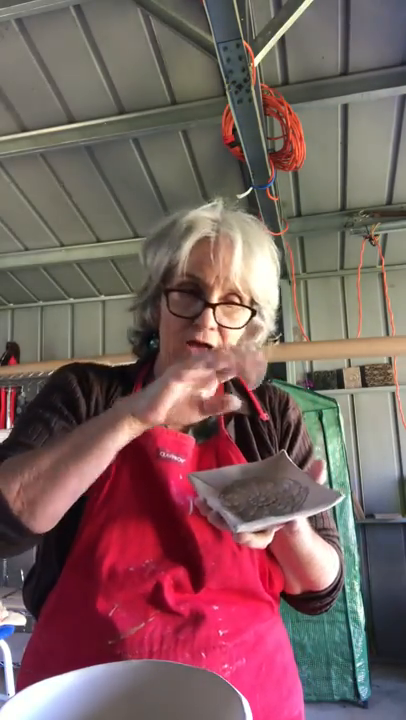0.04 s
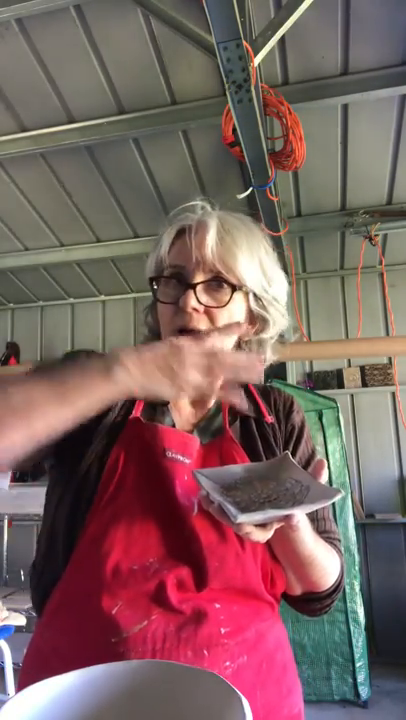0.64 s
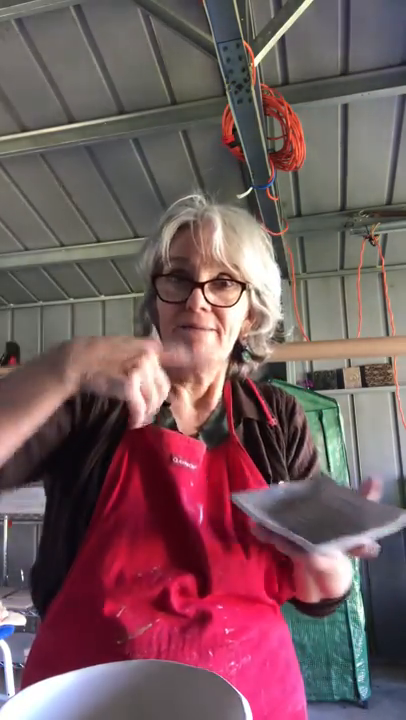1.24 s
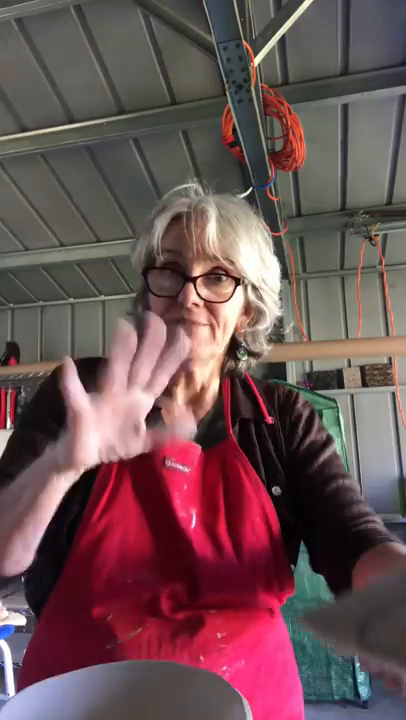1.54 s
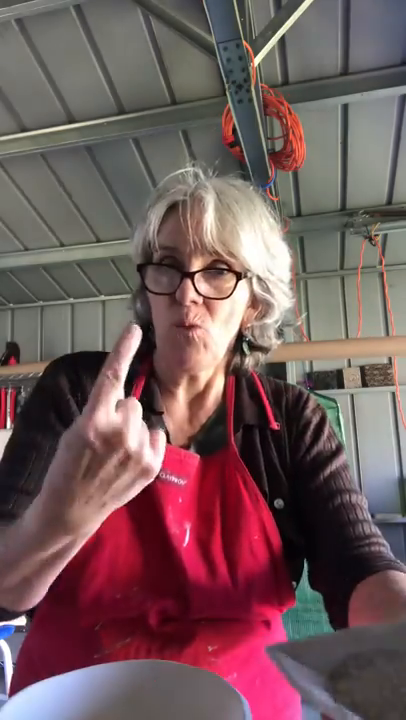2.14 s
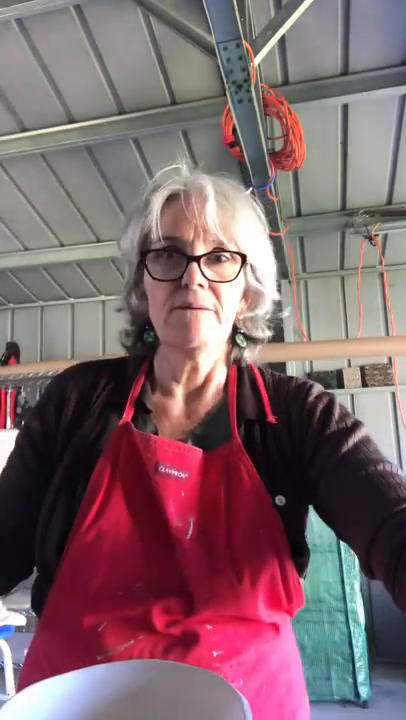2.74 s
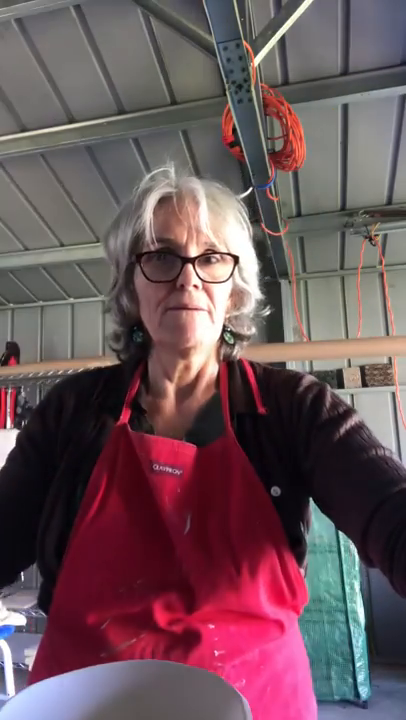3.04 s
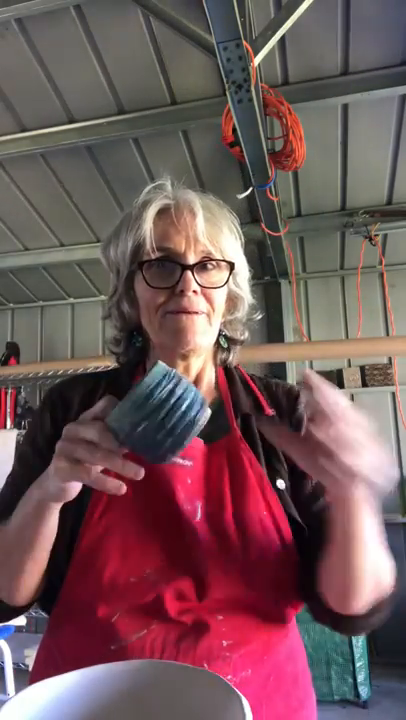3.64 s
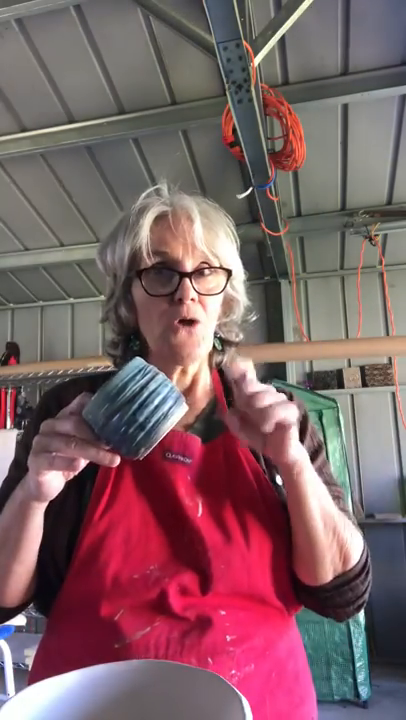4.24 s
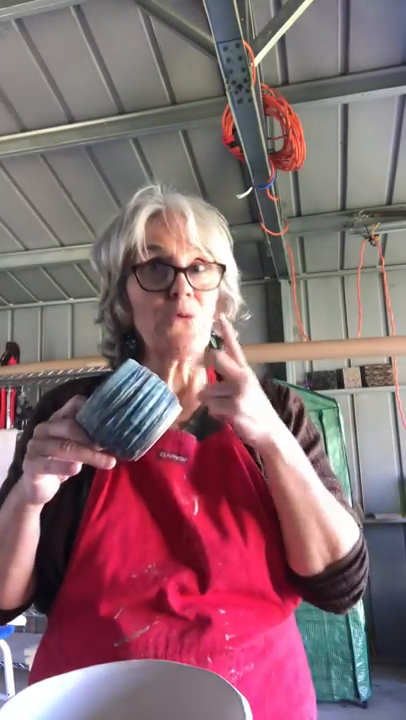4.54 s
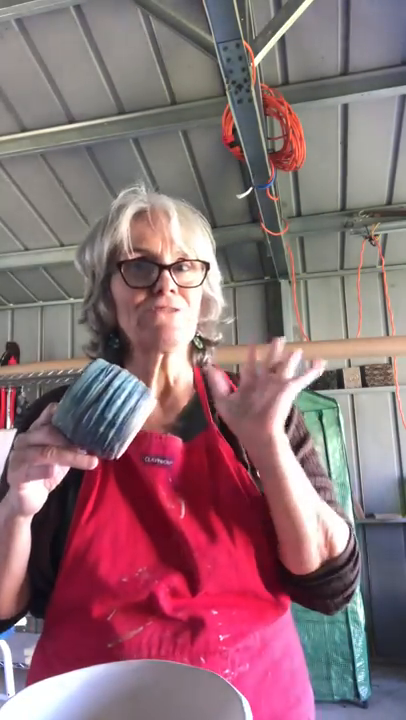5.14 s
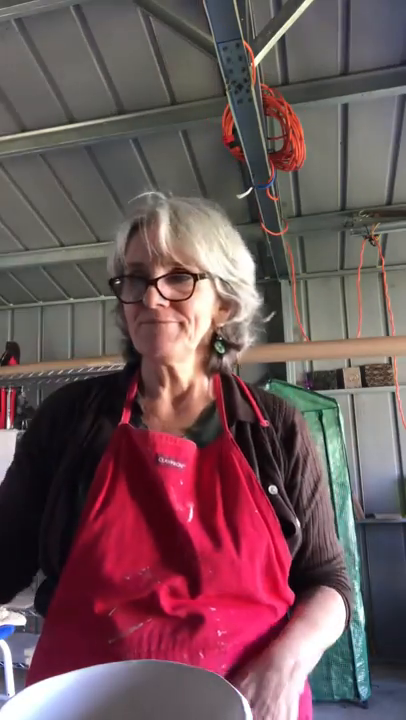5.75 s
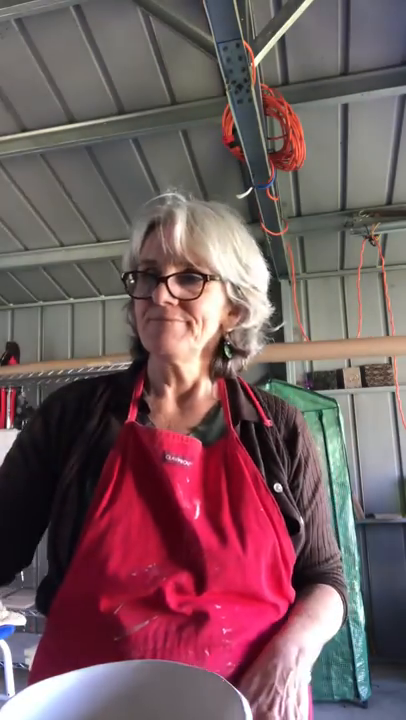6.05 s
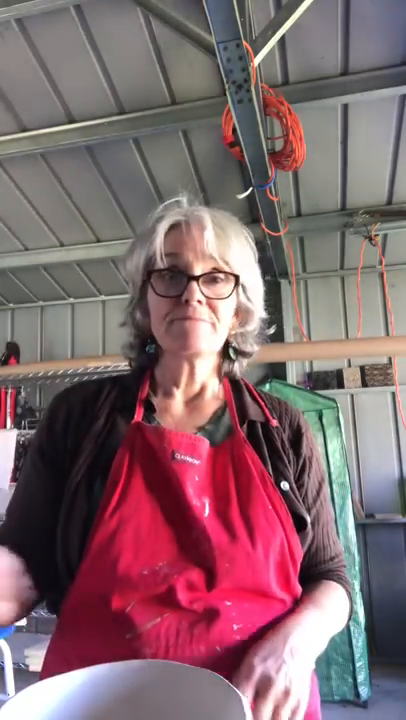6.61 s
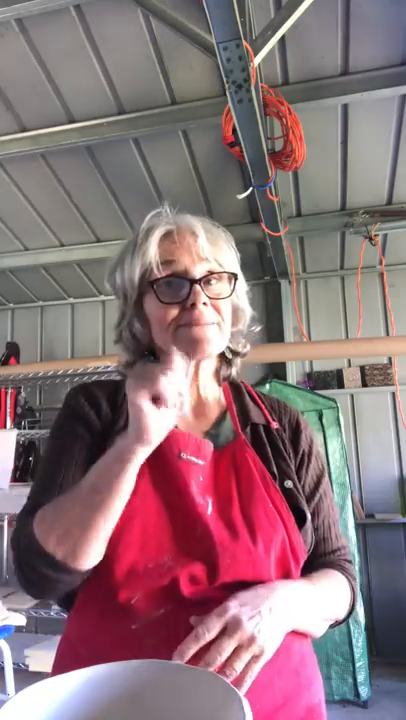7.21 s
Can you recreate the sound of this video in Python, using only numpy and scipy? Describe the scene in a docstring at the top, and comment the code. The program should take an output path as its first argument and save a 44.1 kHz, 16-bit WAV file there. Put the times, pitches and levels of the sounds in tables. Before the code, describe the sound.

In a quiet workshop, a dish knocks down on wood, sleeves rustle softly, and a cup is picked up and later clatters back.

```python
"""A glazed dish is set down on a wooden bench close by, ringing the boards, in a metal-roofed workshop.
Further off a stoneware cup is dragged off a shelf and later put back, its foot chattering to rest.
Sleeves rustle and fingers tap and slide in between; a bird calls faintly over the hush of outdoor air.
The shed adds short diffuse echoes."""
import sys
import numpy as np
from scipy import signal
from scipy.fft import rfft, irfft
from scipy.io import wavfile
from scipy.ndimage import uniform_filter1d

SR = 44100
rng = np.random.default_rng(int(sys.argv[2]) if len(sys.argv) > 2 else 0)


def persist_wave(psi):
    """Save psi, clipped to +-1, as 16-bit WAV."""
    counts = np.round(np.clip(psi, -1, 1) * 32767).astype(np.int16)
    wavfile.write(sys.argv[1], SR, np.atleast_2d(counts).T)


N = 329634
TIME_S = np.arange(N) / SR
RING_S = TIME_S[:SR // 2]

# cup foot touching the shelf: start_s, level_db, looseness (of the grip, 0-1)
FOOT_CONTACTS = [(2.9913, -46.5, 0.2), (3.1017, -53, 0.1), (3.175, -49, .02), (6.2123, -49, .05),
                 (6.41, -55, 0.5), (6.4134, -45, .55), (6.4244, -38.5, 0.75), (6.432, -51, 0.6),
                 (6.437, -39, 0.83), (6.4405, -49, .2)]
# hand-damped stoneware: mode_hz, level_db, t60_s
CUP_MODES = [(1754, -12, .22), (2325, -16, .14), (2401, -8, .07), (3280, -19, .03), (3402, -17, .05),
             (3890, -13, .05), (4310, -11, .018), (4736, -10, .03), (4808, -15, .04), (5450, -2, .016),
             (5780, -4, .013), (6270, -13, .05), (7380, -15, .025), (7880, -20, .02), (9600, -22, .02),
             (12810, -18, .022)]


def undb(db):
    """Decibels to gain."""
    return 10 ** (np.asarray(db) / 20)


def unit(x):
    """Scale to rms 1."""
    return x / np.sqrt(np.mean(x ** 2))


def colour(x, spectrum):
    """Filter by (freq_hz, gain_db) points."""
    hz, db = np.transpose(spectrum)
    bins_hz = np.fft.rfftfreq(len(x), 1 / SR) + 1
    return irfft(rfft(x) * undb(np.interp(np.log(bins_hz), np.log(hz), db)), len(x))


def band(x, lo_hz, hi_hz):
    """Band-pass."""
    return signal.sosfilt(signal.butter(2, [lo_hz, hi_hz], "band", fs=SR, output="sos"), x)


def highpass(x, cut_hz):
    """Thin the bass."""
    return signal.sosfilt(signal.butter(2, cut_hz, "high", fs=SR, output="sos"), x)


def wander(rate_hz):
    """Smooth random drift, rms 1."""
    size = int(SR / rate_hz)
    steps = np.repeat(rng.standard_normal(N // size + 1), size)
    return unit(uniform_filter1d(steps, size)[:N])


def add(track, start_s, sound):
    """Mix a sound into the track."""
    i = int(start_s * SR)
    track[i:i + len(sound)] += sound[:N - i]


def fade(t60_s):
    """Exponential decay."""
    return np.exp(-np.log(1000) * RING_S / t60_s)


def ring(modes):
    """Impulse response of a body; its modes push the air with differing signs."""
    signs = np.resize([1, -1, -1, 1, -1], len(modes))
    return sum(sign * undb(db) * fade(t60_s) * np.sin(2 * np.pi * hz * RING_S)
               for sign, (hz, db, t60_s) in zip(signs, modes))


def burst(spectrum, t60_s):
    """Crowded, fast-dying modes as coloured noise."""
    return unit(colour(rng.standard_normal(len(RING_S)), spectrum)) * fade(t60_s)


def strike(blows, body):
    """Each blow rings the body; a softer contact lasts longer and loses the highs."""
    out = np.zeros(N)
    for start_s, level_db, cut_hz, *body_args in blows:
        contact = signal.butter(3, min(cut_hz, SR / 2 - 1), fs=SR, output="sos")
        hit = signal.sosfilt(contact, body(*body_args))
        add(out, start_s, hit * undb(level_db) / np.std(hit[:SR // 100]))  # level over the first 10 ms
    return highpass(out, cut_hz=45)  # every blow is thinned below 45 Hz


def hush(level_db=-54.5, waver_db=1.9):
    """Steady outdoor air through the walls; the rumble wavers a little."""
    # air spectrum: freq_hz, density_db
    spectrum = [(15, -59), (25, -26), (41, -6), (69, 1.5), (110, -7.5), (148, -8.5), (305, -12.5),
                (495, -20), (1110, -22.5), (2360, -30.5), (3170, -34), (4870, -39), (6730, -39.5),
                (10400, -47), (15500, -47)]
    air = unit(colour(rng.standard_normal(N), spectrum))
    rumble = band(air, lo_hz=38.7, hi_hz=310)
    return undb(level_db) * (air + rumble * (undb(waver_db * wander(rate_hz=5)) - 1))


def shed(x, first_s=0.0077, roof_s=0.054, roof_width_s=0.0066, roof_db=3):
    """Diffuse echoes, duller as they fade, with a swell when the roof answers."""
    # reverberation bands: centre_hz, t60_s, level_db
    bands = [(100, 0.97, 0.5), (300, 0.43, 5.5), (890, .5, 3.5), (2120, 0.4, -0.5), (3840, 0.44, -2.5),
             (6860, 0.19, -7), (12000, 0.29, 0)]
    log_centres = np.log([hz for hz, _, _ in bands])
    log_bins = np.log(np.fft.rfftfreq(len(RING_S), 1 / SR) + 1)
    noise_spectrum = rfft(rng.standard_normal(len(RING_S)))
    response = np.zeros(len(RING_S))
    for share, (_, t60_s, level_db) in zip(np.eye(len(bands)), bands):
        band_noise = irfft(noise_spectrum * np.interp(log_bins, log_centres, share), len(RING_S))
        response += undb(level_db) * band_noise * fade(t60_s)
    swell = undb(roof_db * np.exp(-((RING_S - roof_s) / roof_width_s) ** 2))
    return signal.fftconvolve(x, response * swell * (RING_S > first_s))[:N] / np.sqrt(SR / 20)


def bird(level_db=-70, waver=0.0395):
    """Thin, wavering whistles."""
    # calls: start_s, length_s, pitch_hz
    calls = [(4.968, 0.097, 3150), (5.08, .06, 3315), (5.14, 0.06, 3340), (6.569, 0.11, 3100)]
    out = np.zeros(N)
    for start_s, length_s, pitch_hz in calls:
        size = int(length_s * SR)
        hz = pitch_hz * (1 + waver * wander(rate_hz=200)[:size])
        whistle = np.sin(2 * np.pi * np.cumsum(hz) / SR)
        add(out, start_s, undb(level_db) * unit(whistle * np.hanning(size)))
    return out


def finger_slides(level_db=-80):
    """Dry skin on skin: brief, very high swishes."""
    # slides: start_s, length_s
    slides = [(2.0, 0.073), (3.88, 0.12), (4.134, .14)]
    out = np.zeros(N)
    for start_s, length_s in slides:
        size = int(length_s * SR)
        swish = band(rng.standard_normal(len(RING_S)), lo_hz=10500, hi_hz=16000)[:size]
        add(out, start_s, undb(level_db) * unit(swish * np.hanning(size)))
    return out


def stroke(peak_s, rise_s, fall_s, level_db):
    """Gain of a rub that speeds up until peak_s, then slows."""
    away = np.abs(TIME_S - peak_s) / np.where(TIME_S < peak_s, rise_s, fall_s)
    return undb(level_db) * np.exp(-away ** 1.6)  # exponent: 1 pointed, 2 rounded


def clothes(flutter_db=1.9, bright_gain=1.3):
    """Fibres catch and slide unevenly as the arms move; a palm brushes the apron."""
    # arm movements: peak_s, rise_s, fall_s, level_db, bright_hz
    movements = [(1.575, 0.11, 0.1, -61.5, 7200), (2.52, 0.12, 0.089, -61.5, 5700),
                 (2.81, 0.15, 0.06, -65, 6460), (3.15, 0.34, 0.094, -66, 3940), (3.41, .09, .06, -66, 5570),
                 (3.66, .1, 0.24, -71.5, 3000), (5.739, .014, .085, -64.5, 4440),
                 (6.88, 0.07, 0.19, -67.5, 3000)]
    # rubbed cloth: freq_hz, gain_db
    spectrum = [(800, -9), (2000, 3.5), (4000, 0), (5700, 0), (8000, -4), (10500, -4.5), (12500, -4),
                (16000, -14)]
    fibres = rng.standard_normal(N) * undb(rng.exponential(size=N))
    swish = unit(colour(fibres, spectrum)) * undb(flutter_db * wander(rate_hz=60))
    palm = unit(band(rng.standard_normal(N), lo_hz=435, hi_hz=1060))
    out = palm * stroke(peak_s=7.5, rise_s=0.36, fall_s=0.15, level_db=-60)
    for *movement, bright_hz in movements:
        bright = signal.lfilter(*signal.iirpeak(bright_hz, Q=2.4, fs=SR), swish)
        out += unit(swish + bright_gain * bright) * stroke(*movement)
    return out


def finger_taps():
    """Soft skin contacts: a broad resonance that dies within a few cycles."""
    # taps: start_s, level_db, centre_hz
    taps = [(0.205, -64, 2770), (1.7201, -66.5, 2640), (1.7745, -57.5, 2380), (3.71, -52, 1580),
            (4.7745, -65, 1800)]
    out = np.zeros(N)
    for start_s, level_db, centre_hz in taps:
        resonance = np.sin(2 * np.pi * centre_hz * RING_S) * fade(t60_s=0.0019)
        tap = band(resonance, lo_hz=690, hi_hz=3350)
        add(out, start_s, tap * undb(level_db) / np.std(tap[:SR // 100]))
    return out


def cup_drag(start_s=2.91, end_s=3.205, attack_s=0.026, release_s=0.037, level_db=-63.5):
    """Grit under the unglazed foot slips on wood, waking the cup's lowest mode; louder at each clink."""
    slips_per_s, catch_db, catch_s = 3000, 3, 0.02
    strengths = rng.standard_normal(N) * undb(1.1 * rng.exponential(size=N))
    slips = strengths * (rng.random(N) < slips_per_s / SR)
    low_ring = band(signal.fftconvolve(slips, ring(CUP_MODES))[:N], lo_hz=1200, hi_hz=1970)
    grit = band(slips, lo_hz=2000, hi_hz=8300)
    scrape = undb(-6) * unit(low_ring) + undb(-1) * unit(grit)
    pull = np.clip(np.minimum((TIME_S - start_s) / attack_s, (end_s - TIME_S) / release_s), 0, 1)
    catches = np.max([np.exp(-np.abs(TIME_S - s) / catch_s) for s, _, _ in FOOT_CONTACTS], axis=0)
    return scrape * pull * undb(level_db + catch_db * catches)


def rebound(start_s, level_db, looseness, hop_s=0.0018, scatter=0.098):
    """The foot lands, hops, lands again; a looser grip gives more treble, ring and rebound."""
    cut_hz = np.interp(looseness, [0, 1], [8200, 14000])
    grip_db = np.interp(looseness, [0, 1], [-2, 5.5])
    rebound_db = np.interp(looseness, [0, 1], [-28, -1])
    again_s = start_s + hop_s * (1 + scatter * rng.standard_normal())
    return [(start_s, level_db, cut_hz, grip_db), (again_s, level_db + rebound_db, cut_hz, grip_db)]


def cup_clinks(ring_db=-5, scatter_db=2, grip_hz=2800, grip_octaves=0.5):
    """Hard contacts: a crack and the cup's ring, its modes weighted anew at each point of the foot."""
    # contact crack: freq_hz, gain_db
    crack = [(600, -25), (1800, -7), (4000, -6.5), (5700, 0.5), (7200, -18), (10500, -21), (13000, -28),
             (16000, -15)]

    def cup(grip_db):
        modes = []
        for hz, db, t60_s in CUP_MODES:
            held = np.exp(-(np.log2(hz / grip_hz) / grip_octaves) ** 2)  # wall modes under the hand
            mode_db = db + ring_db + grip_db * held + scatter_db * rng.standard_normal()
            modes.append((hz, mode_db, t60_s))
        return ring(modes) + undb(5) * burst(crack, t60_s=0.0098)
    return strike([landing for contact in FOOT_CONTACTS for landing in rebound(*contact)], cup)


def cup_on_shelf():
    """The cup knocks on the shelf and rings the board."""
    # knocks: start_s, level_db, cut_hz
    knocks = [(3.1195, -43.5, 1520), (3.1290, -39, 181), (6.2133, -30.5, 2480), (6.2230, -37, 1690),
              (6.4090, -36.5, 1810), (6.4205, -40, 400), (6.4365, -38, 2600)]
    # shelf modes: mode_hz, level_db, t60_s
    modes = [(102, -7, 0.12), (164, 2.5, 0.046), (191, -2, 0.05), (271, 1, 0.059), (351, 0, 0.18),
             (454, -4, 0.024), (588, -1, 0.032), (764, -6, 0.11), (971, -4.5, 0.15), (1160, -18, 0.049),
             (1272, -4, 0.057), (1465, -1, 0.016), (1630, -22, 0.059), (2400, 1.5, 0.014)]
    # crowded short modes: freq_hz, gain_db
    wood = [(50, 8), (150, -2.5), (300, -2.5), (500, 2), (750, 0), (1200, -5.5), (1800, -15), (2700, -10.5),
            (4000, -9), (9000, -12)]
    return strike(knocks, lambda: ring(modes) + undb(2.5) * burst(wood, t60_s=0.072))


def dish_on_bench(ref_cut_hz=794, ref_db=-31, db_per_octave=8.6):
    """The dish thuds on the bench, then softer bumps; a harder blow is a shorter, brighter contact."""
    # knocks: start_s, level_db
    knocks = [(2.7507, -20), (2.8751, -26.5), (3.0805, -38.5), (3.4315, -41.5), (3.4630, -37),
              (3.4754, -39)]
    # bench top modes: mode_hz, level_db, t60_s
    modes = [(96.6, -6, 0.42), (125, -5, 0.13), (168, 2, 0.06), (225, -5.5, 0.12), (273, 4.5, 0.08),
             (313, -17.5, 0.66), (411, -3.5, 0.052), (450, -5.5, 0.041), (526, -4, 0.096),
             (593, -5.5, 0.13), (712, 4.5, 0.064), (816, -16, 0.027), (920, -1, 0.049), (997, -1.5, 0.055),
             (1124, -0.5, 0.046), (1370, -12, 0.055), (1470, -17, .05), (1650, -5, 0.049),
             (1807, -18, 0.066), (2370, -5, .02), (2830, -9.5, 0.034)]
    # crowded short modes: freq_hz, gain_db
    wood = [(50, -7), (140, 2), (300, 3.5), (600, -1), (1150, -6.5), (1500, -11.5), (2000, -14),
            (2700, -35), (3400, -27), (7000, -18), (15000, -36)]
    blows = [(start_s, db, ref_cut_hz * 2 ** ((db - ref_db) / db_per_octave)) for start_s, db in knocks]
    return strike(blows, lambda: ring(modes) + undb(4) * burst(wood, t60_s=0.085))


def scene():
    """The further a source, the more of it arrives as echo; the bird comes only that way."""
    dish, shelf, clinks = dish_on_bench(), cup_on_shelf(), cup_clinks()
    handling = cup_drag() + clothes() + finger_slides() + finger_taps()
    echoes = shed(undb(-11) * dish + undb(-2) * shelf + undb(-4.5) * clinks + undb(-7) * handling + bird())
    return (dish + shelf + clinks + handling + echoes + hush())[None]


def record(dry, notch_hz=10400, notch_depth=0.21, top_hz=15750):
    """Thinned deep bass, a shallow treble notch and a steep top cut."""
    x = highpass(dry, cut_hz=38)
    x = x - notch_depth * signal.lfilter(*signal.iirpeak(notch_hz, Q=9, fs=SR), x)
    return signal.sosfilt(signal.ellip(10, 0.2, 70, top_hz, fs=SR, output="sos"), x)


dry = scene()
out = record(dry)
persist_wave(out)
```